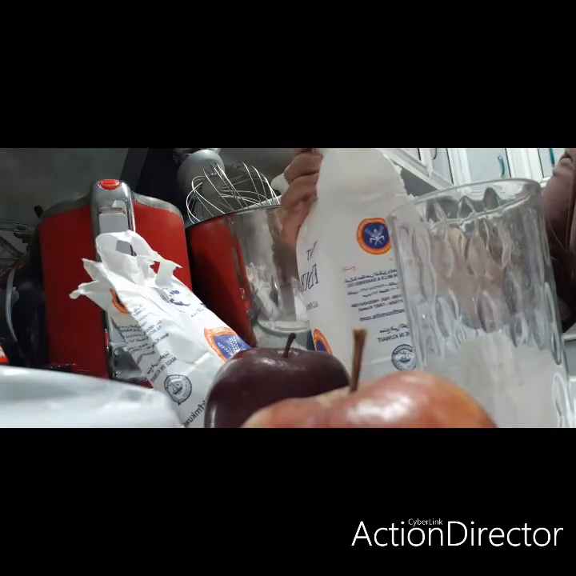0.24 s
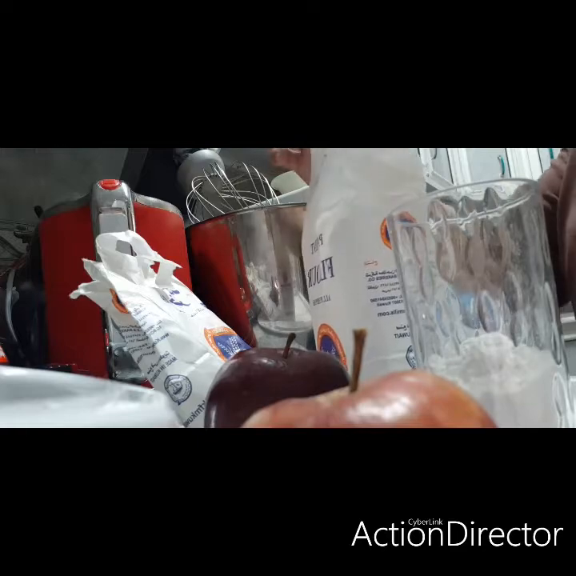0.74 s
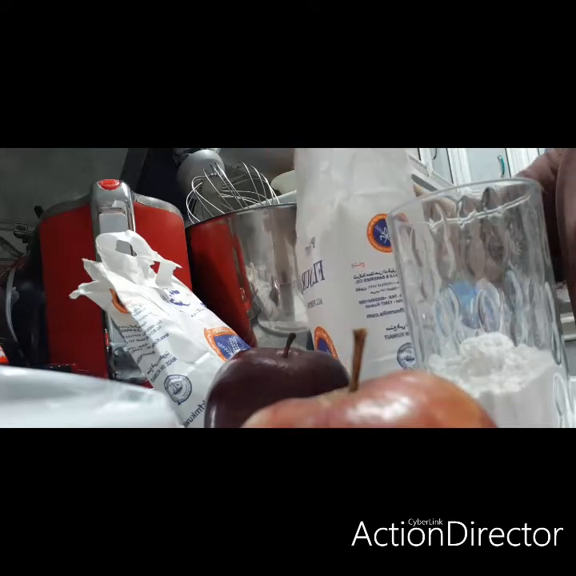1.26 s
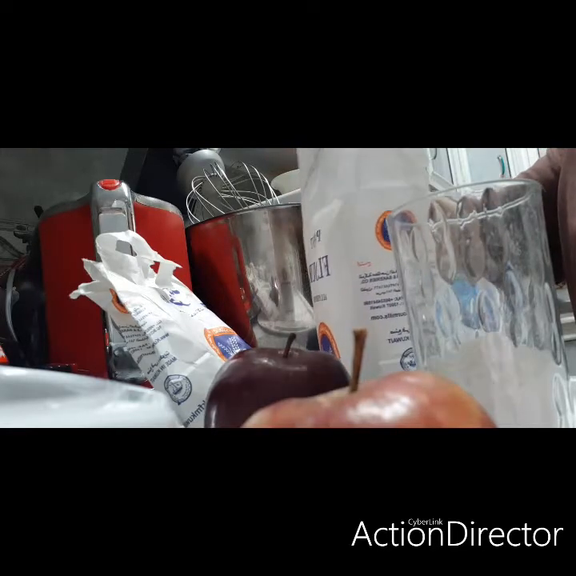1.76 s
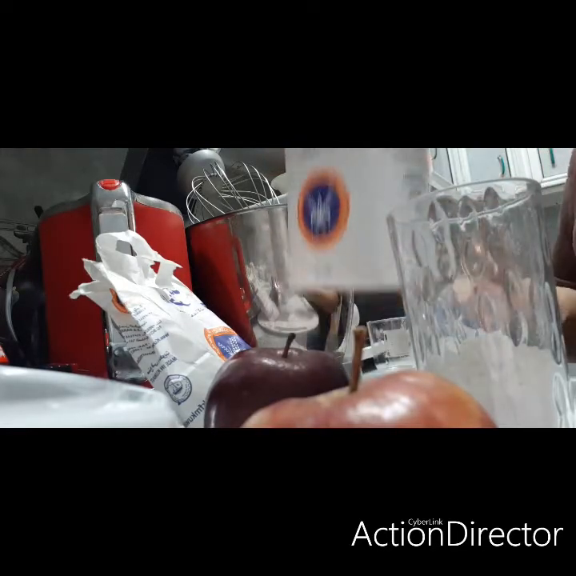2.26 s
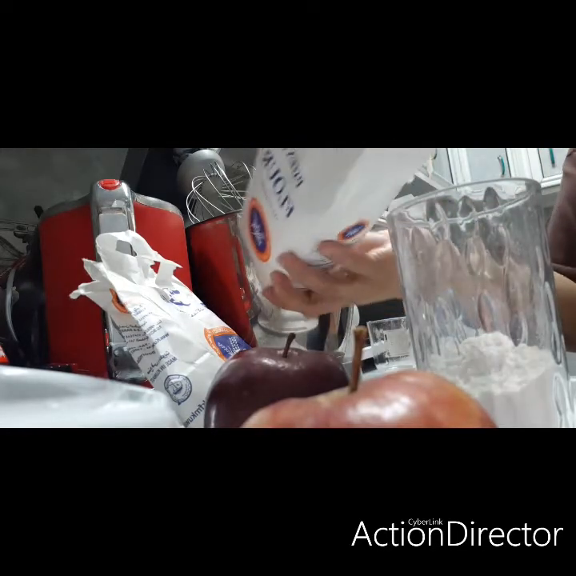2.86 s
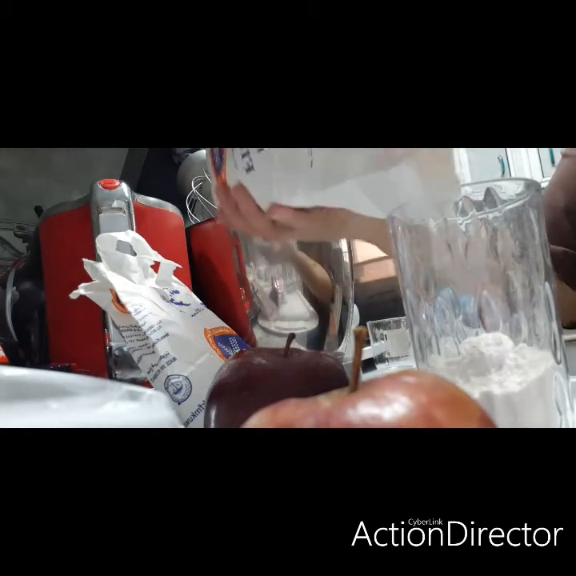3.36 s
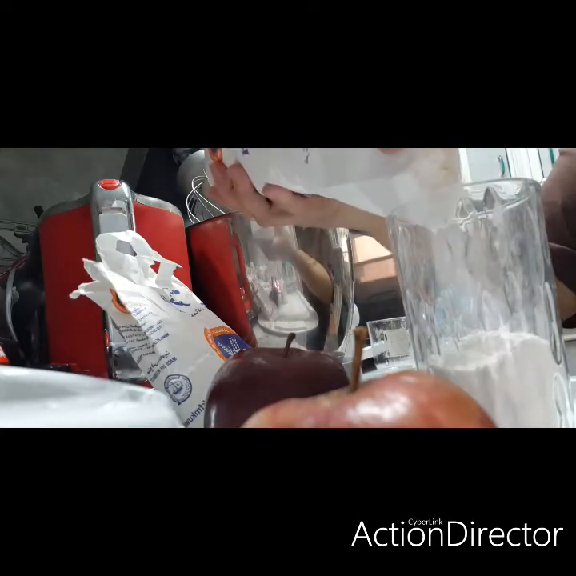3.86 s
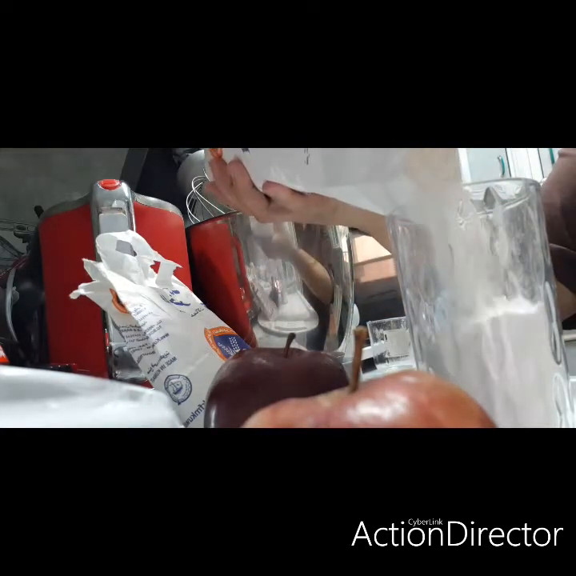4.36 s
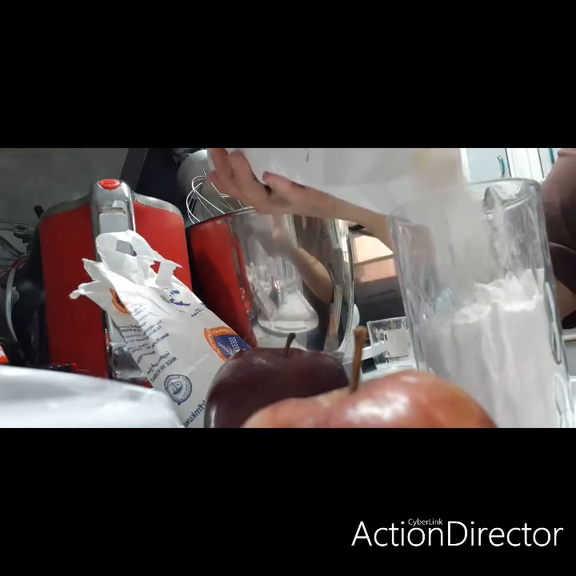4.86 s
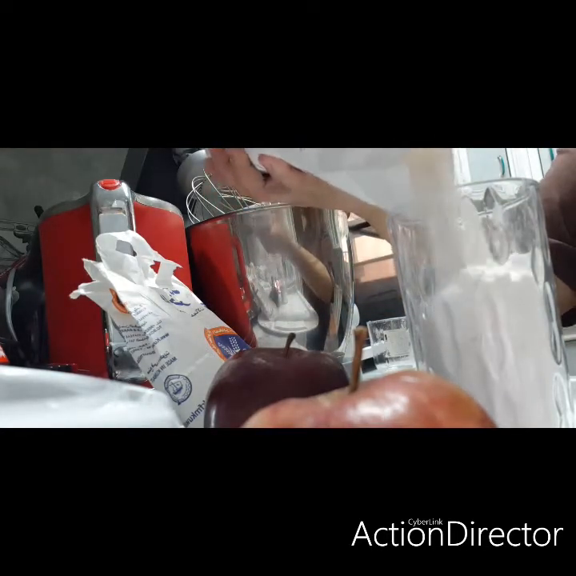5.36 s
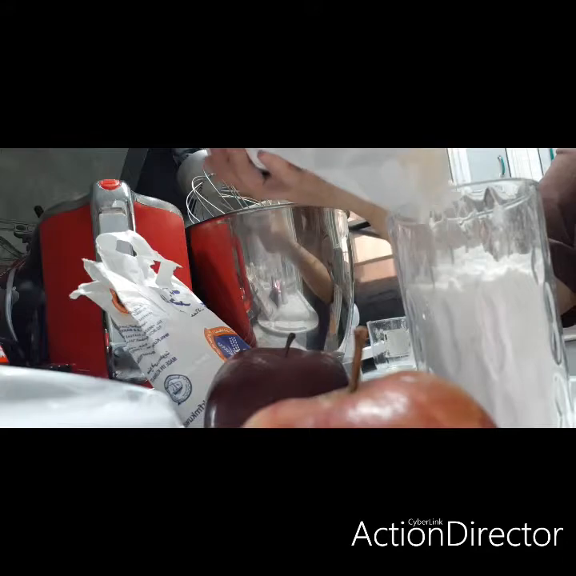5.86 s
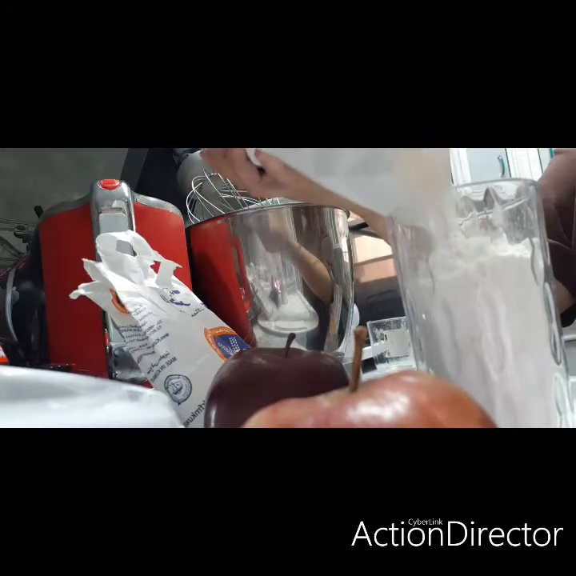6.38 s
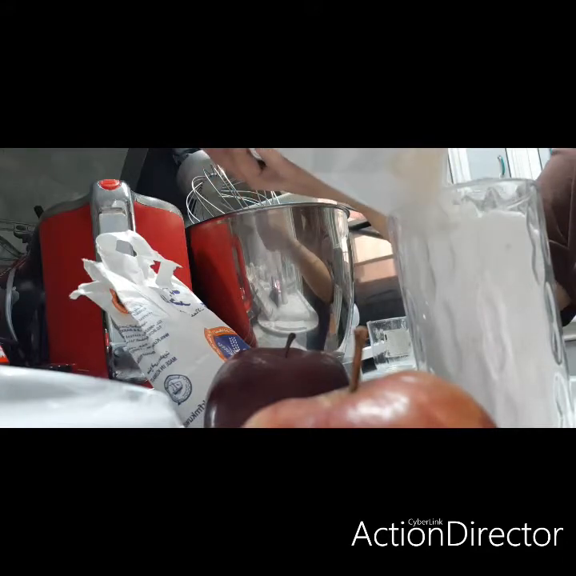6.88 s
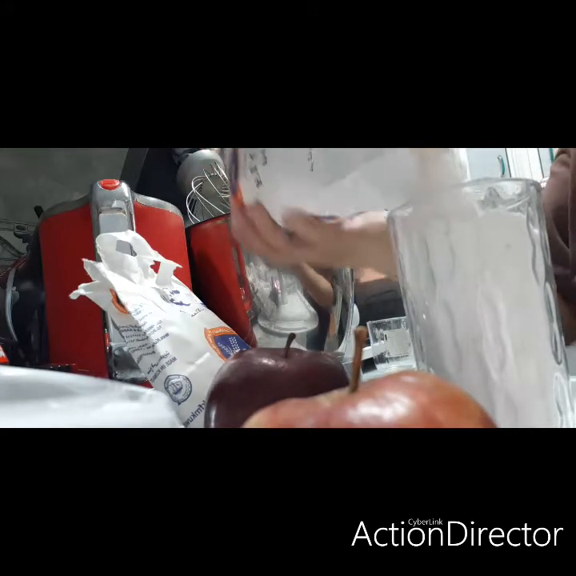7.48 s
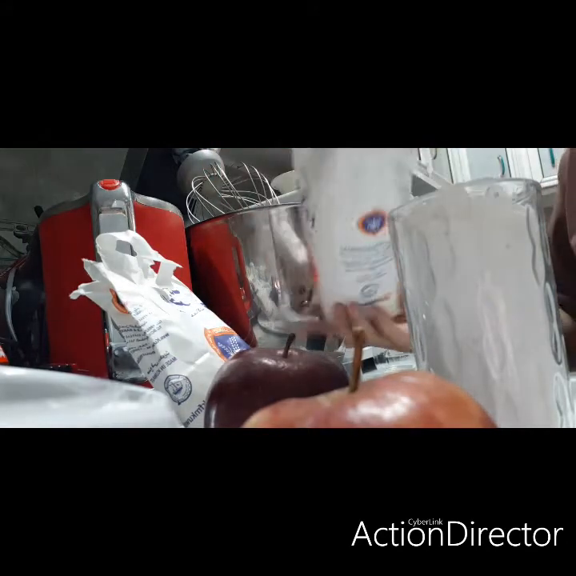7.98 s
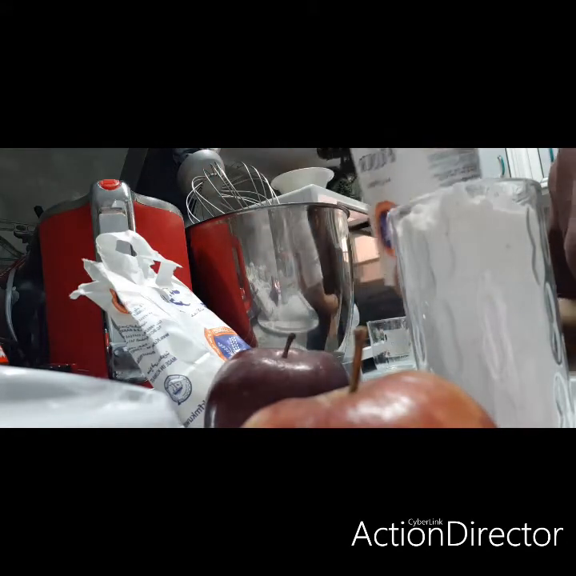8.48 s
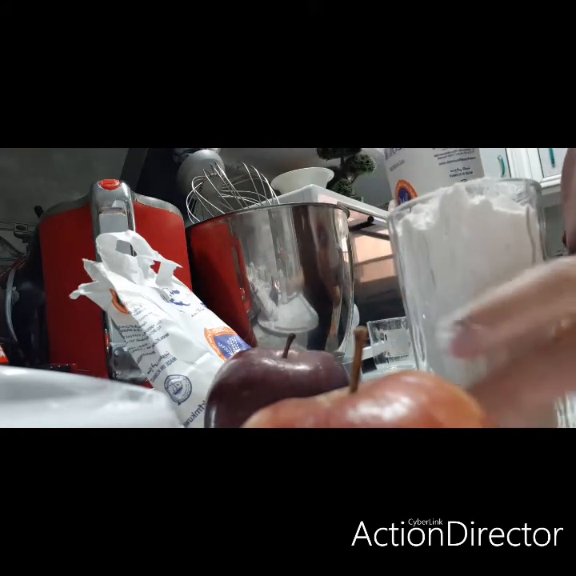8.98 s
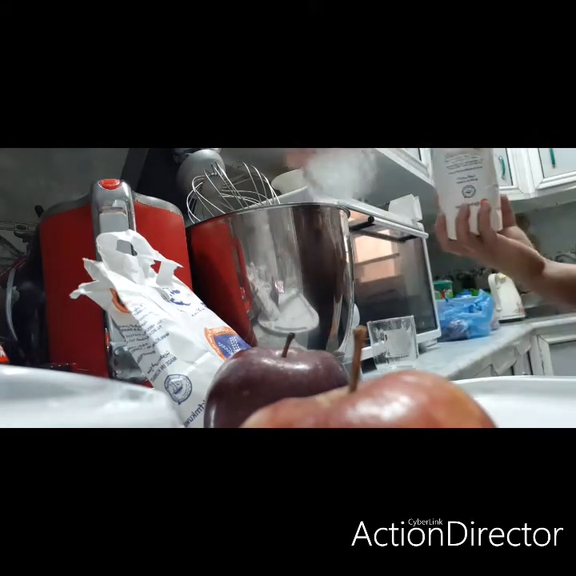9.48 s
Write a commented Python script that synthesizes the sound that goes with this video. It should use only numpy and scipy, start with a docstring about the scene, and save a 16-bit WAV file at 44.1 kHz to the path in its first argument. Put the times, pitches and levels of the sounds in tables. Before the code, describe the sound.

A paper flour bag crinkles and snaps close by, then flour pours into a glass jug with a soft hiss and two plops.

```python
"""A paper flour bag is pulled open on a kitchen counter: creases snap, the paper crumples and rubs, and
the counter takes a few dull bumps. Lifted, the bag knocks twice against a glass jug. Around four seconds
in, flour slides out with a soft hiss and two lumps plop into the jug. The empty bag crinkles and scuffs
more quietly as it is taken away, and two last bumps close the scene. All is heard from close by, in a
small, hard kitchen with a low hum."""
import sys
import numpy as np
from scipy import signal
from scipy.fft import rfft, irfft, next_fast_len
from scipy.io import wavfile
from scipy.ndimage import uniform_filter1d

SR = 44100
rng = np.random.default_rng(int(sys.argv[2]) if len(sys.argv) > 2 else 0)


def transcribe(signal):
    """Save signal, clipped to [-1, 1], as a 16-bit WAV file at the path in sys.argv[1]."""
    frames = np.atleast_2d(signal).T
    limited = np.clip(frames, -1, 1)
    pcm = np.round(limited * 32767).astype(np.int16)
    wavfile.write(sys.argv[1], SR, pcm)


N = 429093

# resonances of the bag's air and walls: centre_hz, width_hz, level_db
BAG_RESONANCES = [(467, 35, -8), (615, 35, -4), (925, 70, -14), (1245, 180, -10)]
# the colour of rubbing paper: frequency_hz, level_db
RUB_SPECTRUM = [(40, -22.5), (110, -1.5), (500, 3), (1400, -9), (2700, -12), (4300, -8), (9000, -13),
                (15000, -16)]
# how the bag is held: time_s, grip (0 smooth rubbing, 1 creasing), left_over_right_db
HOLD = [(2, 0.65, 1.5), (2.8, 0.54, 2), (3.7, 0.06, 3), (4.9, 0.57, 3), (7.3, 0.51, 2.5), (7.8, 0.33, 2)]
LOW_HZ, HIGH_HZ = 950, 3500  # crossovers between the paper's body, crunch and sparkle
LEAD_S, LEAD_DB = .004, -19  # length and level of the soft lead-in heard just before each snap


def amp(db):
    """Decibels to gain."""
    return 10 ** (np.asarray(db) / 20)


def unit(x):
    """x at rms 1."""
    return x / np.sqrt(np.mean(x ** 2) + 1e-20)


def along(points, hz):
    """(Hz, value) points read on a log axis."""
    f, v = np.transpose(points)
    return np.interp(np.log(hz + 1), np.log(f + 1), v)


def curves(rows):
    """One value per sample for each column after the time."""
    times, *columns = np.transpose(rows)
    return [np.interp(np.arange(N) / SR, times, column) for column in columns]


def below(hz, edge_hz, order=8):
    """Gain of a low-pass."""
    return 1 / np.sqrt(1 + (hz / edge_hz) ** order)


def above(hz, edge_hz, order=8):
    """Gain of a high-pass."""
    return np.sqrt(1 - below(hz, edge_hz, order=order) ** 2)


def resonant(hz, peaks):
    """Gain of (Hz, width, dB) resonances standing out of a flat response."""
    return 1 + sum(amp(db) / (1 + (2 * (hz - centre) / width) ** 2) for centre, width, db in peaks)


def filtered(x, gain):
    """x through the causal filter that has this gain over frequency."""
    n = x.shape[-1]
    m = 2 * next_fast_len(n // 2 + 2048)
    cepstrum = irfft(np.log(np.maximum(gain(np.fft.rfftfreq(m, 1 / SR)), 1e-6)), m)
    cepstrum[1:m // 2] *= 2
    cepstrum[m // 2 + 1:] = 0
    return irfft(rfft(x, m) * np.exp(rfft(cepstrum)), m)[..., :n]


def spread(pair):
    """Two unrelated signals become left and right: narrow in the bass, wide in the treble."""
    # how alike the two channels are: frequency_hz, correlation
    likeness = [(250, 0.74), (600, 0.79), (1100, 0.067), (2200, 0.15)]
    mid = filtered(unit(pair[0]), lambda hz: np.sqrt(1 + along(likeness, hz)))
    side = filtered(unit(pair[1]), lambda hz: np.sqrt(1 - along(likeness, hz)))
    return np.array([mid + side, mid - side])


def noise(gain):
    """Stereo noise of rms 1 in this colour."""
    return unit(spread(filtered(rng.standard_normal((2, N)), gain)))


def shifting_noise(gain, patchy_db):
    """Stereo noise of rms 1 whose resonances change from one small crease to the next."""
    spectra = signal.stft(noise(gain), nperseg=512)[2]
    patches = uniform_filter1d(rng.standard_normal(spectra.shape[1:]), size=5, axis=0)
    patches = unit(uniform_filter1d(patches, size=4, axis=1))
    return unit(signal.istft(spectra * amp(patchy_db * patches), nperseg=512)[1][:, :N])


def burst(gain, life_s, linger, slips_per_s=2200):
    """A transient: a soft lead-in, a few sharp slips and a scattered tail; energy of 10 ms at rms 1."""
    n, attack_s = 3000, .0007
    t = np.arange(n) / SR - LEAD_S
    slipping = rng.random(n) < slips_per_s / SR
    slipping[np.searchsorted(t, attack_s)] = True  # one slip always lands on the attack
    slips = slipping * rng.choice([-1, 1], (2, n)) * rng.uniform(0.4, 1, (2, n))
    slips *= np.exp(-abs(t) / life_s)
    scatter = linger * rng.standard_normal((2, n)) * np.exp(-abs(t) / .012)
    swell = np.maximum(1 - np.exp(-t / attack_s), amp(LEAD_DB))
    return unit(spread(filtered((slips + scatter) * swell, gain))) * np.sqrt(.01 * SR / n)


def add(out, s, sound):
    """Mix a burst in so that its attack starts at time s, just after its lead-in."""
    out[:, round((s - LEAD_S) * SR):][:, :sound.shape[1]] += sound


def crinkle(per_s, scatter_db, life_s):
    """The envelope, rms 1, of many small creases of random size."""
    count = int(per_s * N / SR)
    sizes = amp(scatter_db * np.minimum(rng.exponential(size=count), 2.6))
    energy = np.bincount(rng.integers(0, N, count), sizes ** 2, N)
    return unit(np.sqrt(signal.lfilter([1], [1, -np.exp(-2 / (life_s * SR))], energy)))


def grain(grip):
    """Envelope of paper: gripped, it breaks into separate creases; loosely held, its fibres only rub."""
    creases = crinkle(per_s=100, scatter_db=6, life_s=.003)
    fibres = crinkle(per_s=2500, scatter_db=2.5, life_s=.0012)
    return unit(np.hypot(grip * creases, (1 - grip) * fibres) / np.hypot(grip, 1 - grip))


def movement(peak_s, length_s, rise_share=0.39, swell_db=27, stop_db=27):
    """The envelope of one gesture: it swells and fades, dropping a further stop_db beyond its ends."""
    t = np.arange(N) / SR
    away = np.maximum((peak_s - t) / rise_share, (t - peak_s) / (1 - rise_share)) / length_s
    return amp(-swell_db * np.minimum(away, 10) - stop_db * np.clip(away - 1, 0, 2))


def room_tone():
    """A low hum of the room, faint hiss and a narrow band of high sizzle."""
    # the colour of the quiet room: frequency_hz, level_db
    hum_spectrum = [(25, -25.5), (58, -10), (120, -7.5), (400, -8.5), (750, -33), (5500, -35),
                    (12000, -39.5)]
    sizzle = noise(lambda hz: 1 / (1 + ((hz - 6520) / 300) ** 4))
    hum = noise(lambda hz: amp(along(hum_spectrum, hz)))
    return amp(-61.0) * hum + amp(-80.5) * sizzle


def kitchen_reverb(x):
    """Hard walls answer with a short diffuse tail."""
    # how long the room rings: frequency_hz, t60_s
    decay_times = [(150, 0.16), (1500, 0.43), (6000, 0.37), (14000, 0.2)]
    hz, t, spectra = signal.stft(rng.standard_normal((2, SR // 2)), SR, nperseg=256)
    decay = amp(-60 * t / along(decay_times, hz)[:, None])
    tail = signal.istft(spectra * decay, SR, nperseg=256)[1]
    tail = np.pad(spread(tail), ((0, 0), (220, 0)))  # 5 ms of pre-delay
    return signal.fftconvolve(x, tail / np.linalg.norm(tail[0]), axes=1)[:, :N]


def counter_bumps():
    """A soft push on the counter gives a short, dull thud."""
    # pushes on the counter: start_s, level_db, pitch_hz
    pushes = [(1.206, -30, 147), (1.243, -29, 183), (1.455, -30.5, 159.8), (8.965, -40.5, 110),
              (9.161, -46.5, 111.7)]
    out, t = np.zeros(N + SR), np.arange(SR // 4) / SR
    for start_s, level_db, pitch_hz in pushes:
        thud = np.sin(2 * np.pi * pitch_hz * t) * (1 - np.exp(-t / 0.0071)) * np.exp(-t / 0.014)
        out[round(start_s * SR):][:len(t)] += amp(level_db) * thud / thud.max()
    return out[:N]


def jug_clinks(ring_hz=2170, width_hz=910):
    """The glass jug gives a dull clink, smothered by the bag that leans on it."""
    # the bag knocks against the jug: start_s, level_db
    knocks = [(2.25, -32), (3.402, -36.5)]
    out = np.zeros((2, N + SR))
    ring = lambda hz: 1 / (1 + (2 * (hz - ring_hz) / width_hz) ** 2)
    for start_s, level_db in knocks:
        add(out, start_s, amp(level_db) * burst(ring, life_s=.003, linger=.06))
    return out[:, :N]


def flour_plops(hollow_hz=516, width_hz=126):
    """A lump of flour lands in the jug with a hollow thud and a short puff."""
    # falling lumps: start_s, thud_db, puff_db
    lumps = [(3.893, -30, -36), (4.704, -37.5, -62)]
    out = np.zeros((2, N + SR))
    hollow = lambda hz: above(hz, 125, order=4) / np.hypot(1, 2 * (hz - hollow_hz) / width_hz)
    for start_s, thud_db, puff_db in lumps:
        thud = burst(hollow, life_s=0.0044, linger=0.029)
        puff = burst(lambda hz: above(hz, 1300, order=4) * below(hz, 6600), life_s=0.0093, linger=0.021)
        add(out, start_s, amp(thud_db) * thud + amp(puff_db) * puff)
    return out[:, :N]


def bag_scuffs():
    """Dry rubbing sticks and slips; each stroke sounds one broad, hollow resonance of the bag."""
    # the bag rubs on the hand and the jug: peak_s, length_s, level_db, ring_hz
    rubs = [(1.089, 0.15, -38, 740), (7.858, 0.055, -39.5, 540), (8.028, 0.28, -45, 628),
            (8.56, 0.48, -63.5, 850), (8.856, 0.13, -51.5, 600), (9.199, 0.1, -52, 1400)]
    friction = noise(lambda hz: amp(along(RUB_SPECTRUM, hz)))
    slips = friction * crinkle(per_s=700, scatter_db=2, life_s=.002)
    ring = lambda x, hz: signal.lfilter(*signal.iirpeak(hz, Q=1, fs=SR), x)
    return sum(amp(level_db) * movement(peak_s, length_s) * unit(ring(ring(slips, ring_hz), ring_hz))
               for peak_s, length_s, level_db, ring_hz in rubs)


def rustle_levels():
    """Level rides in dB for flexing, crumpling and sliding, summed over all gestures and pours."""
    # pulls, squeezes and turns of the bag: peak_s, length_s, crumple_db, slide_over_crumple_db
    strokes = [(-0.018, 0.58, -37.5, -1.5), (0.366, 0.4, -36, -0.5), (0.475, 0.34, -36.5, 0.5),
               (0.763, 0.55, -36.5, -5), (0.971, 0.29, -38.5, -3), (1.268, 0.45, -30.5, -15),
               (1.484, 0.16, -33.5, 6), (1.614, 0.31, -40, -4), (1.978, 0.27, -35, -5.5),
               (2.505, 0.086, -48.5, 0), (2.654, 0.4, -45.5, -4), (2.792, 0.32, -51, -4),
               (2.997, 0.66, -46, -2.5), (3.387, 0.73, -55, 4.5), (3.597, 0.45, -52.5, 4.5),
               (5.014, 0.35, -59, 4), (5.287, 0.6, -49, -2), (5.672, 0.5, -55.5, 4),
               (5.836, 0.64, -50.5, 2.5), (6.13, 0.17, -48, -3), (6.266, 0.95, -56.5, -0.5),
               (6.584, 0.64, -51, 1), (6.758, 0.62, -50, 0.5), (7.145, 1, -56.5, 1.5),
               (7.648, 0.6, -55.5, 6), (7.83, 0.23, -53.5, 12), (7.988, 0.14, -48.5, 12.5),
               (8.174, 0.31, -54.5, 10.5), (8.32, 0.51, -51.5, 2), (8.74, 0.92, -70, 10)]
    # flour running down the paper: peak_s, length_s, crumple_db, slide_over_crumple_db
    pours = [(4.022, 0.72, -56.5, 7.5), (4.282, 0.75, -56, 0), (4.525, 0.47, -48.5, 5),
             (4.693, 0.77, -57.5, 4)]
    # the full bag is stiff; opened and emptied, it flexes more: time_s, flex_over_crumple_db
    slackness = [(0.1, -12), (1.2, -1), (6.6, 2)]
    crumple = slide = 0
    for peak_s, length_s, level_db, bright_db in strokes + pours:
        power = (amp(level_db) * movement(peak_s, length_s)) ** 2
        crumple += power
        slide += power * amp(bright_db) ** 2
    crumple_db, slide_db = 10 * np.log10([crumple, slide])
    return crumple_db + curves(slackness)[0], crumple_db, slide_db


def rustle_and_pour():
    """The bag's walls flex in the lows and crumple in the mids; paper and flour slide with a fine hiss."""
    flex_db, crumple_db, slide_db = rustle_levels()
    grip = curves(HOLD)[0]
    shared = grain(grip)
    texture = lambda: unit(np.hypot(shared, grain(grip)))  # some creases sound in every band, some in one
    rub = lambda hz: amp(along(RUB_SPECTRUM, hz))
    body = lambda hz: rub(hz) * resonant(hz, BAG_RESONANCES)
    flex = shifting_noise(lambda hz: body(hz) * below(hz, LOW_HZ), patchy_db=4)
    crumple = shifting_noise(lambda hz: rub(hz) * above(hz, LOW_HZ) * below(hz, HIGH_HZ), patchy_db=4.7)
    slide = shifting_noise(lambda hz: rub(hz) * above(hz, HIGH_HZ, order=5), patchy_db=3.3)
    fine = unit(texture() ** np.minimum(grip + .45, 1))  # loose paper and flour hiss more smoothly
    return (amp(flex_db + 1.45) * flex * texture()
            + amp(crumple_db + 1.64) * crumple * texture()
            + amp(slide_db - 0.5) * slide * fine)


def crease_colour(tilt_db):
    """The gain curve of one crease: buckling paper, the bag, and the random modes of the nearest panel."""
    # the paper as it buckles: frequency_hz, level_db
    buckle_spectrum = [(40, -32), (150, -10), (400, -5), (700, 0), (1300, -3), (2100, -10), (4200, -10),
                       (10000, -22), (15000, -22)]
    modes_hz = np.array([620, 1350, 5200]) * np.exp(.16 * rng.standard_normal(size=3))
    panel = [(hz, hz / q, 2.5) for hz, q in zip(modes_hz, [9, 6, 7])]
    sheet = lambda hz: amp(along(buckle_spectrum, hz)) * resonant(hz, BAG_RESONANCES)
    tilt = lambda hz: amp(tilt_db * np.log2(1 + np.minimum(hz, 7000) / 1500))
    return lambda hz: sheet(hz) * resonant(hz, panel) * tilt(hz)


def crease_snaps():
    """A crease buckles in three layers: a low panel thump, a midrange crack and a treble tick."""
    # the clearest creases: start_s, crack_db, thump_over_crack_db, tick_over_crack_db
    creases = [(0.0538, -30.5, -3, -1.5), (0.1066, -33, 3, 1), (0.183, -37.5, -1.5, -4),
               (0.349, -40, 3, 10.5), (0.384, -32.5, -1.5, 4), (0.439, -34.5, -9, 4),
               (0.4718, -33, -4.5, -5.5), (0.5105, -39.5, 7, -2), (0.5857, -29.5, -8.5, 1.5),
               (0.6563, -27.5, -5, -3), (0.7031, -37, 1.5, 0), (0.7403, -31.5, 1.5, -2.5),
               (0.761, -43.5, 11.5, 9), (0.8563, -25.5, -5, -1), (0.931, -31, -12, -10.5),
               (1.0202, -30.5, -8.5, -1.5), (1.1537, -24.5, -8, -5), (1.1902, -24.5, -5, -11),
               (1.2078, -28.5, 4.5, -1), (1.225, -18, -1.5, -5.5), (1.243, -24, 5.5, -3.5),
               (1.289, -30.5, 1, 2), (1.3045, -26, -14, 1.5), (1.326, -31.5, -2.5, -0.5),
               (1.368, -35, 10, -12), (1.3765, -34, 0, 5), (1.4368, -28.5, -3.5, -12),
               (1.4653, -29.5, 0, 7), (1.473, -21, -13, -18), (1.607, -29, -1.5, -3.5),
               (1.6812, -28, -9.5, -4.5), (1.797, -41, 4.5, -11.5), (1.908, -28, -11, -8.5),
               (1.9699, -31.5, -1, -1), (1.9786, -28.5, 2, -1), (2.005, -34.5, -4, -0.5),
               (2.128, -38, -1, -12), (2.249, -30, -4.5, -9), (2.548, -36, -15, -15),
               (3.004, -35.5, -14, -9.5), (3.05, -39.5, -17.5, -3), (3.4, -41.5, 3.5, -4.5),
               (3.636, -40.5, -5, -8), (4.9791, -48, -15, -8), (4.9976, -46, -27, 3.5),
               (5.245, -55, -16, -5), (5.274, -39.5, -12, -4), (5.2994, -45, -3, 8),
               (5.3125, -36, -1.5, -2.5), (5.3495, -45.5, -21, 18.5), (5.4136, -52, -18.5, 1),
               (5.454, -45.5, -30, 1.5), (5.534, -51.5, -17.5, -2.5), (5.596, -32.5, -11.5, -12.5),
               (5.667, -40.5, -14, -8.5), (5.713, -42, -9.5, -8.5), (5.792, -40, -8, -9),
               (5.81, -39, -3, -4.5), (5.85, -41.5, 4.5, -7), (5.959, -40, -10, -4.5),
               (5.988, -39.5, -0.5, -10.5), (6.1071, -41.5, -18, -12.5), (6.2438, -45.5, -20, -5),
               (6.314, -43.5, -0.5, -7.5), (6.5647, -39.5, -9, -21), (6.597, -49, 9, 2),
               (6.62, -47.5, 7, -27), (6.7081, -31.5, -3.5, -16.5), (6.7523, -38, 2, -23),
               (6.9133, -44, -3, -9.5), (6.977, -57.5, -7, 9), (7.0133, -49, -20, -8),
               (7.224, -47, -25, -5), (7.295, -49, -24, -6.5), (7.4635, -53.5, -21.5, -8),
               (7.667, -54.5, -20, 14), (7.955, -53, 3, 11.5), (8.0144, -37.5, -1, -9),
               (8.028, -42.5, 6, -13), (8.199, -33.5, -4, -20), (8.259, -48, -14, 3.5),
               (8.326, -36.5, -7, -11)]
    out = np.zeros((2, N + SR))
    for start_s, crack_db, depth_db, bright_db in creases:
        thump_db, tick_db = crack_db + depth_db, crack_db + bright_db
        size = np.clip(1 + (max(crack_db, thump_db) + 40) / 25, .6, 1)  # faint creases die away sooner
        tilt_db = np.clip(.3 * (bright_db + 4), -4, 4)  # a dull pop loses treble, a thin tick keeps it
        crack_low_hz = LOW_HZ * amp(np.clip(-depth_db - 12, 0, 4))  # thinner with no panel behind it
        crack_top_hz = HIGH_HZ * amp(min(tilt_db, 0))
        tick_low_hz, tick_top_hz = HIGH_HZ * amp(max(tilt_db, 0)), 11000 * amp(2 * tilt_db)
        colour = crease_colour(tilt_db)
        thump = burst(lambda hz: colour(hz) * above(hz, 360, order=3) * below(hz, LOW_HZ),
                      life_s=.0036 * size, linger=.016)
        crack = burst(lambda hz: colour(hz) * above(hz, crack_low_hz) * below(hz, crack_top_hz),
                      life_s=.0036 * size, linger=.014)
        tick = burst(lambda hz: colour(hz) * above(hz, tick_low_hz) * below(hz, tick_top_hz, order=4),
                     life_s=.0028 * size, linger=.015)
        add(out, start_s, amp(thump_db) * thump + amp(crack_db) * crack + amp(tick_db) * tick)
    return out[:, :N]


def scene():
    """Bag and jug sit a little left, furthest during the pour, and feed the reverb; the bumps stay dry."""
    pan_db = curves(HOLD)[1]
    action = crease_snaps() + rustle_and_pour() + bag_scuffs() + flour_plops() + jug_clinks()
    action *= amp([pan_db / 2, -pan_db / 2])
    return action + amp(-11.5) * kitchen_reverb(action) + counter_bumps() + room_tone()


def record(dry):
    """The microphone ports colour the treble; a low cut and a steep high cut limit the band."""
    # resonances of the ports: centre_hz, width_hz, level_db
    ports = [(6525, 500, 0.5), (14630, 1100, -16)]
    coloured = filtered(dry, lambda hz: resonant(hz, ports) * above(hz, 51, order=6))
    m = next_fast_len(N + 4096)
    high_cut = below(np.fft.rfftfreq(m, 1 / SR), 15600, order=160)
    return irfft(rfft(coloured, m) * high_cut, m)[:, :N]


dry = scene()
out = record(dry)
transcribe(out)
```